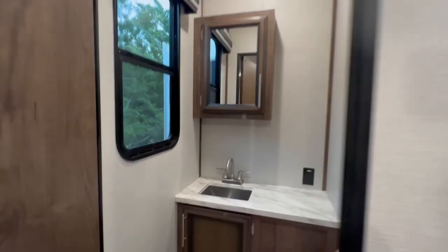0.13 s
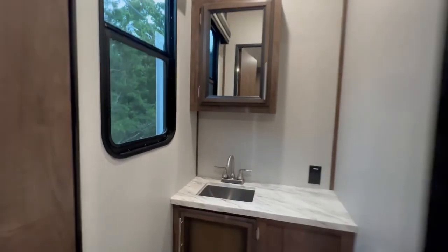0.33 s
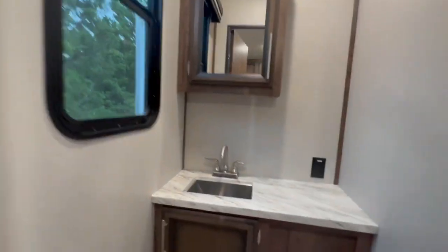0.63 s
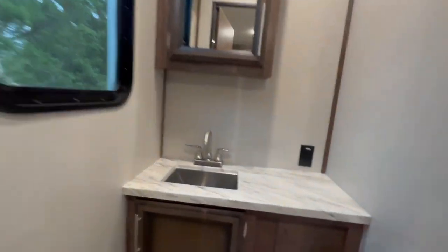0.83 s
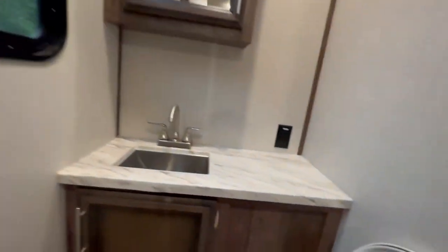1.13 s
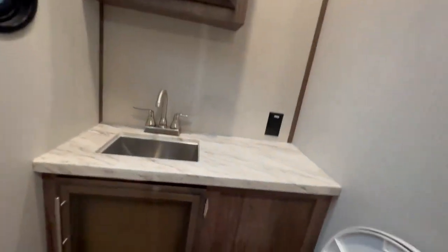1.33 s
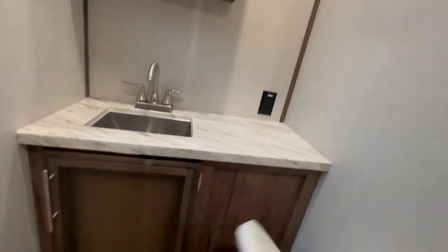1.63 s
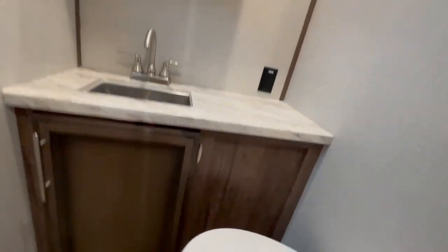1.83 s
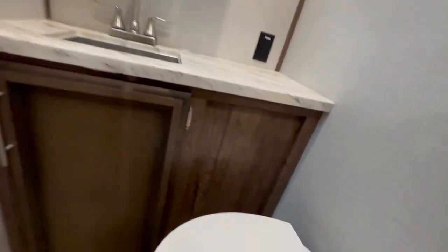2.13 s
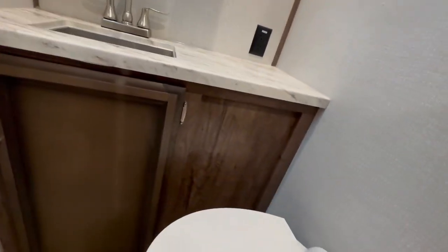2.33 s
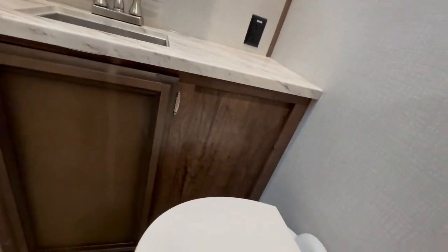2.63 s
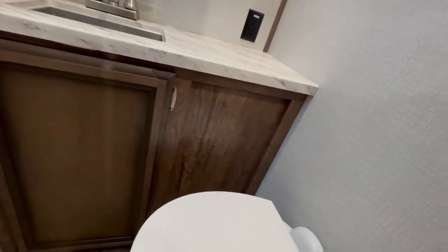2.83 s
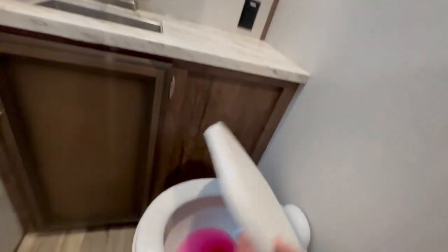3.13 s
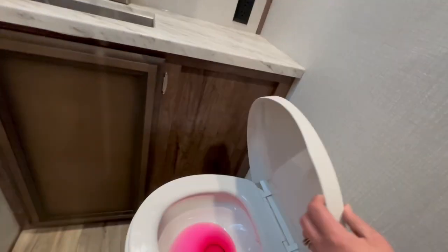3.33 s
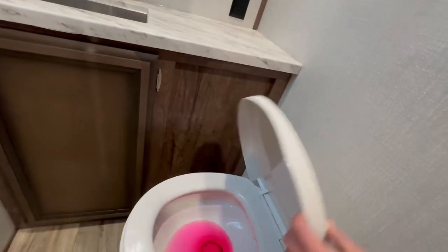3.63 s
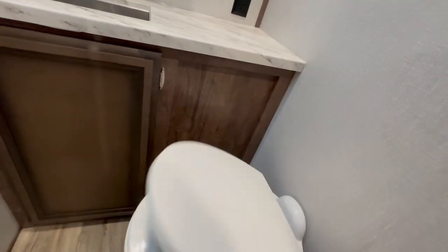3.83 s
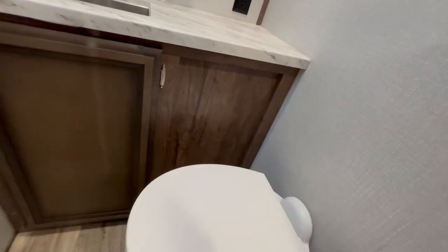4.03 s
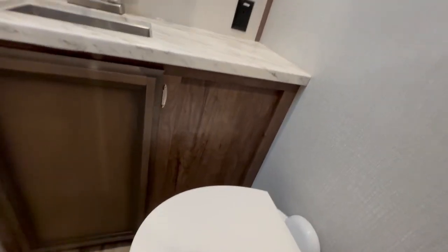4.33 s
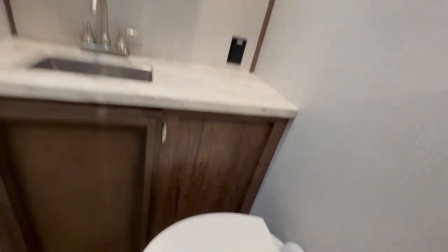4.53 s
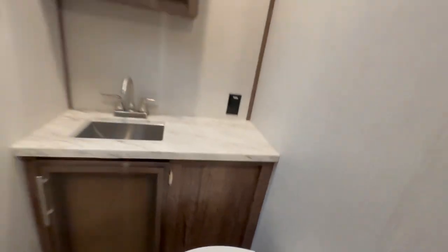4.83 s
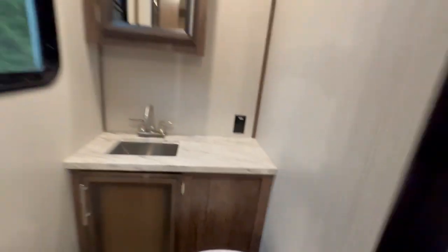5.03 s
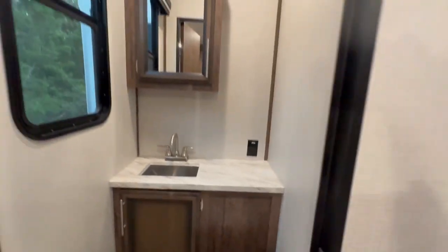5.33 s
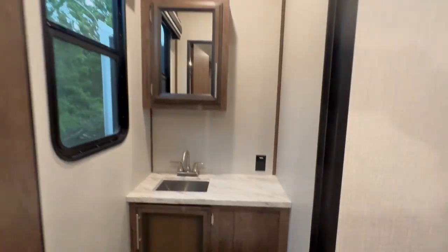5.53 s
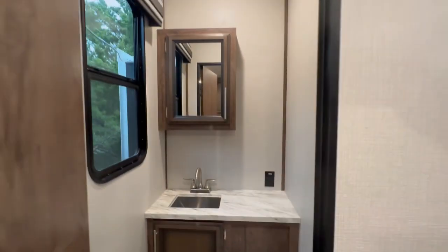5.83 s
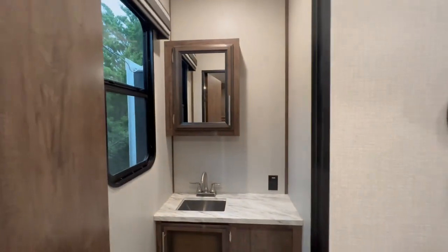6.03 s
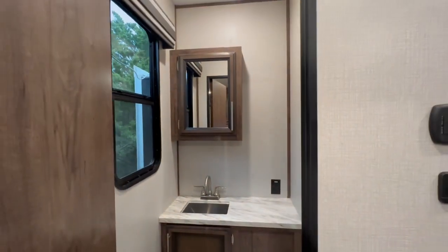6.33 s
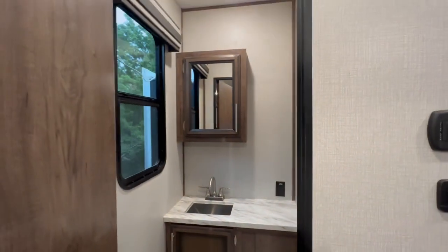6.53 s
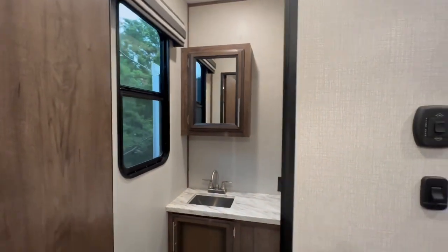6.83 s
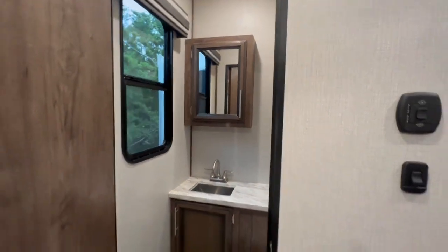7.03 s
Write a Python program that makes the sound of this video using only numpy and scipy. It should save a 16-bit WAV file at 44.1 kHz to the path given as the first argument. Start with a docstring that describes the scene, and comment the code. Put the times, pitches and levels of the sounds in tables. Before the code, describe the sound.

Hard plastic toilet lid clacks and drops shut in a tiny bathroom, with heavy low microphone bumps, soft knocks and faint hiss.

```python
"""Plastic toilet lid in a very small bathroom.

The lid is lifted, knocked back on its hinge and dropped shut. Each clack is a noise crack that dies
between close walls, plus ringing lid, bowl and floor modes. Fingers bump the hand-held microphone: thumps
and taps of diving pitch. Moving about gives soft knocks and footfalls (damped modes), faint ticks and
rustles (bright decaying noise). Below lies coloured noise: an uneven low rumble and an even hiss.
"""
import sys
import numpy as np
from scipy import signal
from scipy.fft import rfft, irfft
from scipy.io import wavfile
from scipy.ndimage import uniform_filter1d

SR = 44100
rng = np.random.default_rng(int(sys.argv[2]) if len(sys.argv) > 2 else 0)


def generate_wav(signal):
    """Clip the signal to [-1, 1] and save it as 16-bit WAV at the path in sys.argv[1]."""
    frames = np.transpose(np.atleast_2d(signal))
    scaled = np.clip(frames, -1, 1) * 32767
    pcm = np.round(scaled).astype(np.int16)
    wavfile.write(sys.argv[1], SR, pcm)


N = 316638


def from_db(db):
    """Amplitude factor of a level in dB."""
    return 10 ** (np.asarray(db) / 20)


def rms_one(x):
    """Scales a sound to rms 1."""
    return x / np.sqrt(np.mean(x ** 2) + 1e-20)


def onset_one(x):
    """Scales a stereo sound so that its first 30 ms have rms 1."""
    return x / np.sqrt(np.mean(x[:, :int(.03 * SR)] ** 2) + 1e-20)


def at_hz(points, hz):
    """Reads a (Hz, dB) table on a log-frequency axis."""
    table_hz, table_db = np.transpose(points)
    return np.interp(np.log(hz), np.log(table_hz), table_db)


def bins_hz(size):
    """FFT bin frequencies, at least 1 Hz."""
    return np.maximum(np.fft.rfftfreq(size, 1 / SR), 1)


def event_time():
    """Time axis of one short sound, 0.5 s."""
    return np.arange(SR // 2) / SR


def add(out, start_s, sound):
    """Mixes a stereo sound in at its start time."""
    i = max(int(start_s * SR), 0)
    out[:, i:i + sound.shape[1]] += sound[:, :max(N - i, 0)]


def coloured(spectrum, size):
    """White noise shaped by a spectrum; rms 1."""
    noise = rfft(rng.standard_normal(size))
    return rms_one(irfft(noise * from_db(at_hz(spectrum, bins_hz(size))), size))


def diffuse(spectrum, size, alike=0.045):
    """Stereo noise from all sides; alike is the left-right correlation."""
    mid = np.sqrt(1 + alike) * coloured(spectrum, size)
    side = np.sqrt(1 - alike) * coloured(spectrum, size)
    return rms_one(mid + side * [[1], [-1]])


def fade(t, rise_s, t60_s):
    """Exponential swell (time constant rise_s) times exponential decay."""
    return (1 - np.exp(-t / max(rise_s, 1e-5))) * from_db(-60 * t / t60_s)


def ring(modes, rise_s, spread_db):
    """Struck modes; force is shared anew per blow, standing waves put some modes out of step between sides."""
    t, out = event_time(), 0
    for hz, db, t60_s, alike in modes:
        apart = np.arccos(np.clip(alike, -1, 1)) * rng.choice([-1, 1])
        phase = rng.uniform(0, 2 * np.pi) + apart * np.array([[0], [1]])
        gain = from_db(db + spread_db * rng.standard_normal((2, 1)))
        out = out + gain * fade(t, rise_s, t60_s) * np.sin(2 * np.pi * hz * t + phase)
    return onset_one(out)


def waver(knots_per_s):
    """Slow random curve over the whole scene; rms 1."""
    knots = rng.standard_normal(int(knots_per_s * N / SR) + 2)
    return rms_one(np.interp(np.arange(N) * knots_per_s / SR, np.arange(len(knots)), knots))


# Handling of the microphone. Each row: time in seconds, handling level in dB (only its swing about the mean counts).
HANDLING_SWING = [(0.0, -49.5), (0.36, -52), (1.3, -46.5), (1.9, -53.5), (2.28, -37.5), (2.46, -49),
                  (3.0, -42.5), (3.62, -46.5), (4.24, -45), (4.4, -38), (5.62, -41), (6.26, -51.5),
                  (6.48, -54), (7.18, -52.5)]
# Rumble colour. Each row: frequency in Hz, relative density in dB per Hz.
RUMBLE_COLOUR = [(22, -19.5), (35, -5.5), (58, 5), (110, -2.5), (160, -7.5), (230, -19.5), (320, -27),
                 (500, -37.5), (1000, -68.5)]
# Hiss colour. Each row: frequency in Hz, relative density in dB per Hz.
HISS_COLOUR = [(200, -16.5), (550, -6.5), (900, 4), (1250, -1.5), (2050, 7.5), (2700, -12), (3500, -12.5),
               (4400, -12), (5200, -21), (6400, -10.5), (7500, -17), (8700, -12), (10000, -45),
               (15000, -45)]
# Background attenuation on the right. Each row: frequency in Hz, attenuation in dB.
RIGHT_LOSS = [(60, 9.5), (250, 8), (700, 5.5), (1290, 5), (2300, 18.5), (4400, 0.5), (8100, 12),
              (15000, -1)]
RUMBLE_DB, RUMBLE_FOLLOWS = -43.5, 0.54   # left level at mean handling; share of the handling swing
HISS_DB = -53.5   # left level


def background(lag_s=0.00071, rumble_own=1.0, hiss_own=0.8):
    """Rumble follows the handling, hiss is even; own is the right's independent part, the rest arrives late."""
    time_s, handling_db = np.transpose(HANDLING_SWING)
    rumble_db = RUMBLE_DB + RUMBLE_FOLLOWS * (handling_db - handling_db.mean())
    lumps_db = 2.66 * waver(knots_per_s=12)
    rumble = from_db(np.interp(np.arange(N) / SR, time_s, rumble_db) + lumps_db)
    layers = [(rumble, RUMBLE_COLOUR, rumble_own), (from_db(HISS_DB), HISS_COLOUR, hiss_own)]
    left, right = 0, 0
    for level, spectrum, own in layers:
        shared = coloured(spectrum, N)
        late = np.roll(shared, round(lag_s * SR))
        left = left + level * shared
        right = right + level * (np.sqrt(1 - own ** 2) * late + own * coloured(spectrum, N))
    shade = from_db(-at_hz(RIGHT_LOSS, bins_hz(N)))
    return np.array([left, irfft(rfft(right) * shade, N)])


# Faint rustles of movement. Each row: start in seconds, level in dB, swell time constant in seconds.
MOVEMENT_RUSTLES = [(.015, -60.5, 0.016), (0.354, -51, 0.0022), (0.544, -55.5, 0.0039),
                    (.974, -54.5, 0.0096), (1.72, -58.5, 0.081), (3.619, -62.5, 0.055), (4.426, -56, 0.017),
                    (4.748, -58.5, 0.008), (4.99, -57.5, 0.007), (6.035, -61, 0.023), (6.496, -57, 0.0032)]
# Colour of rustles and ticks. Each row: frequency in Hz, relative density in dB per Hz.
BRIGHT_COLOUR = [(300, 8.5), (900, 3.5), (2500, 1), (4200, 2.5), (5300, 0), (6500, 3), (8700, -0.5),
                 (10500, -13.5), (14500, -15)]
# t60 of a rustle at RUSTLE_DB; a bigger movement lasts longer
RUSTLE_T60_S, RUSTLE_DB, RUSTLE_DB_PER_DOUBLING = 0.43, -57.5, 9


def rustles(grain=0.06):
    """Brief uneven swells of bright friction noise."""
    out, t = np.zeros((2, N)), event_time()
    for start_s, db, swell_s in MOVEMENT_RUSTLES:
        t60_s = RUSTLE_T60_S * 2 ** ((db - RUSTLE_DB) / RUSTLE_DB_PER_DOUBLING)
        smooth = uniform_filter1d(rng.standard_normal(len(t)), size=300)
        uneven = np.exp(grain * rms_one(smooth))
        friction = diffuse(BRIGHT_COLOUR, len(t), alike=0.18) * uneven
        add(out, start_s, from_db(db) * onset_one(friction * fade(t, swell_s, t60_s)))
    return out * from_db([[.9], [-.9]])


def resonate(x, hz, width_hz):
    """Two-pole resonance, peak gain about 1."""
    r = np.exp(-np.pi * width_hz / SR)
    zeros = np.array([1, 0, -1]) * (1 - r * r) / 2
    poles = [1, -2 * r * np.cos(2 * np.pi * hz / SR), r * r]
    return signal.lfilter(zeros, poles, x)


# Small fittings tick. Each row: start in seconds, level in dB, pitch in Hz, ring at that pitch in dB re the click.
FITTING_TICKS = [(0.742, -50, 2700, -0.5), (0.83, -55, 4100, -2), (1.175, -46.5, 3630, 12),
                 (1.177, -51.5, 1580, 16), (1.401, -51, 1190, 9), (1.51, -51, 3940, 1),
                 (2.06, -58.5, 4640, -5), (3.832, -52.5, 1510, 7), (4.175, -38.5, 8550, -11),
                 (4.332, -51.5, 3960, 2)]
TICK_T60_S = 0.27   # room tail, same for all ticks


def ticks(ring_width=0.3):
    """Light bright contacts with one ringing region, heard mostly through the room."""
    out, t = np.zeros((2, N)), event_time()
    room_tail = fade(t, 0.0017, TICK_T60_S)
    direct = 0.2 * fade(t, 0.00099, 0.038)
    for start_s, db, hz, ring_db in FITTING_TICKS:
        click = diffuse(BRIGHT_COLOUR, len(t), alike=0.099)
        tone = diffuse(BRIGHT_COLOUR, len(t))
        for _ in range(2):
            tone = resonate(tone, hz, ring_width * hz)
        mix = click + from_db(ring_db) * rms_one(tone)
        add(out, start_s, from_db(db) * onset_one(mix * (room_tail + direct)))
    return out * from_db([[.4], [-.4]])


# Soft knocks on wall and cabinet panels.
# Each row: start in seconds, level in dB, pitch in Hz, t60 in seconds, rub in dB re the panel mode.
PANEL_KNOCKS = [(.975, -54.5, 950, 0.56, 13.5), (1.473, -45.5, 341, 0.29, 8),
                (1.513, -40.5, 411, 0.11, 1.5), (1.998, -45.5, 282.4, .2, 1), (2.054, -41, 277.3, .24, 2),
                (2.795, -43.5, 344, 0.23, -12), (3.832, -57.5, 292, 0.21, 7.5),
                (4.339, -43.5, 227, 0.27, -1.5), (5.425, -51, 528, 0.045, -6)]
# Colour of rubs and skin. Each row: frequency in Hz, relative density in dB per Hz.
RUB_COLOUR = [(120, 11), (350, 1), (600, -3.5), (1000, -3), (1600, -14), (4000, -28), (12000, -44)]


def knocks():
    """Dull blows: one damped panel mode and a short noise rub."""
    out, t = np.zeros((2, N)), event_time()
    for start_s, db, hz, t60_s, rub_db in PANEL_KNOCKS:
        rub = onset_one(diffuse(RUB_COLOUR, len(t)) * fade(t, 0.0014, t60_s))
        panel = ring([(hz, 0, t60_s, .6)], rise_s=0.001, spread_db=2.7)
        add(out, start_s, from_db(db) * (panel + from_db(rub_db) * rub))
    return out


def fidgets():
    """Three faint finger bumps at random moments while the free hand is busy: (s, thump dB, tap dB)."""
    return [(rng.uniform(2.528, 4.7), rng.uniform(-33.31, -31.5), rng.uniform(-44.31, -42.5))
            for _ in range(3)]


# Finger bumps on the microphone. Each row: start in seconds, thump on the left in dB, tap on the left in dB.
FINGER_BUMPS = [(1.0572, -3.5, -21), (1.3621, -36, -34), (1.4723, -49, -29), (1.927, -33, -35),
                (2.7092, -29, -29.5), (2.876, -34, -30), (4.0414, -32.5, -28.5), (4.398, -27, -31),
                (4.6762, -13.8, -39.5), (4.715, -13, -31), (4.983, -22, -39), (5.121, -23.5, -43),
                (5.403, -19, -34), (5.428, -15, -36)]
# At BUMP_DB: time from touch to peak, and starting pitch. A heavier thump peaks later and starts higher.
BUMP_DB, BUMP_PEAK_S, BUMP_DB_PER_DOUBLING = -18.5, 0.014, 94
BUMP_HZ, BUMP_DB_PER_OCTAVE = 470, 15


def bumps(right_db=-9, right_lag_rad=2.14, skin_db=-5, shudder_db=-26):
    """Skin tap and thump; pitch dives because highs travel through the casing faster than lows."""
    out, t = np.zeros((2, N)), event_time()
    stretch = .45   # growth of the period per unit time
    sides, lag_rad = from_db([[0], [right_db]]), np.array([[0], [right_lag_rad]])
    for start_s, thump_db, tap_db in FINGER_BUMPS + fidgets():
        heavier_db = thump_db - BUMP_DB
        age = t / (BUMP_PEAK_S * 2 ** (heavier_db / BUMP_DB_PER_DOUBLING))
        start_hz = BUMP_HZ * 2 ** (heavier_db / BUMP_DB_PER_OCTAVE)
        sweep = 2 * np.pi * np.log1p(stretch * t * start_hz) / stretch
        thump = age ** 2 * np.exp(1 - age ** 2) * np.cos(sweep - lag_rad)
        # the grip settles
        shudder = from_db(shudder_db) * coloured(RUMBLE_COLOUR, len(t)) * fade(t, 0.0094, 0.37)
        tap_sweep = 2 * np.pi * 3.87 * np.log1p(t / 0.00345)
        tap = fade(t, 0.00094, 0.024) * np.sin(tap_sweep - lag_rad)
        skin = from_db(skin_db) * coloured(RUB_COLOUR, len(t)) * fade(t, 0.00018, 0.033)
        bump = from_db(thump_db) * (thump + shudder) + from_db(tap_db) * (tap + skin)
        add(out, start_s, sides * bump)
    return out


def contact_db(hz, tilt_db, focus_hz, lift_db, octaves=0.098):
    """Place and hardness of a contact tilt the spectrum and favour one region."""
    distance = np.log2(hz / focus_hz)
    return tilt_db * distance + lift_db * np.exp(-.5 * (distance / octaves) ** 2)


# Broad resonances of the lid shell. Each row: centre in Hz, width in Hz, lift in dB.
SHELL_HUMPS = [(1190, 57, 7), (1485, 44, 2.5), (3400, 790, 4.5), (4590, 250, 9.5)]


def shell_db(hz):
    """Sum of the shell humps, which colour the crack."""
    return sum(lift_db / (1 + (2 * (hz - centre_hz) / width_hz) ** 2)
               for centre_hz, width_hz, lift_db in SHELL_HUMPS)


# Decay of the room. Each row: band centre in Hz, t60 in seconds.
ROOM_DECAY = [(150, 0.41), (500, 0.21), (1400, 0.29), (4500, 0.25), (8000, 0.21), (15000, 0.15)]


def crack(walls, contact, rise_s, direct_db=0, direct_s=0.0014):
    """Hard contact and its dense wall reflections, dying band by band."""
    t, out = event_time(), 0
    hz = bins_hz(len(t))
    noise = rfft(walls) * from_db(contact_db(hz, *contact) + shell_db(hz))
    centres_hz, t60s = np.transpose(ROOM_DECAY)
    for share, t60_s in zip(np.eye(len(centres_hz)), t60s):
        weight = np.interp(np.log(hz), np.log(centres_hz), share)   # crossfades between bands
        out = out + irfft(noise * weight, len(t)) * fade(t, rise_s, t60_s)
    return onset_one(out * (1 + from_db(direct_db) * np.exp(-t / direct_s)))


# Lid blows. Each row: start in seconds, crack level in dB, rise time constant in seconds, tilt in dB per octave,
# pitch favoured by the contact in Hz, its lift in dB, rebound delay in seconds, rebound in dB re the crack,
# bowl level in dB, floor level in dB.
LID_BLOWS = [(1.62, -34, 0.0052, -2.5, 1480, 13, .026, -7, -63, -58),
             (2.4167, -20, 0.0032, -0.5, 1110, 6.5, .011, -17.5, -32.5, -31),
             (2.783, -31, 0.006, -2, 1500, 6.5, 0.02, -9, -40.5, -42.5),
             (4.173, -29.5, 0.0059, -2.5, 443, 9.5, 0.01, -6, -28, -24)]
# Lid modes. Each row: frequency in Hz, level before contact colour in dB, t60 in seconds, left-right likeness -1..1.
LID_MODES = [(458, -13, .16, 0), (655, -15, .18, .3), (782, -11, .27, .9), (1018, -7, .21, .6),
             (1110, -5, .15, .2), (1160, -2, .13, -.3), (1192, 0, .2, -.2), (1265, -14, .18, -.3),
             (1416, -12, .29, -.6), (1518, -8, .29, -.4), (1610, -14, .24, 0), (1900, -12, .2, 0),
             (2249, -10, .2, 0), (2505, -11, .19, .9), (2950, -11, .17, .3), (3212, -8, .19, .4),
             (3386, -11, .25, .4), (3540, -9, .26, .4), (3713, -10, .21, .4), (4194, -10, .16, .4),
             (4575, -6, .21, .7), (4780, -7, .17, .6), (5015, -13, .19, .3), (5361, -13, .18, .3),
             (5896, -11, .15, .3), (6119, -12, .15, .3), (6641, -13, .18, .3)]
# Crack of plastic on plastic. Each row: frequency in Hz, relative density in dB per Hz.
CRACK_COLOUR = [(150, -15), (300, -8.5), (430, -15.5), (750, -2.5), (1150, -2.5), (2000, -4), (2700, -6),
                (4300, -4), (5200, -8), (6400, -2), (7500, -13), (8700, -11), (10500, -21.5), (15000, -35)]
# Hollow bowl modes. Each row: frequency in Hz, relative level in dB, t60 in seconds, left-right likeness.
BOWL_MODES = [(202.4, -7.5, 0.27, 0.26), (243, 7.5, 0.1, 1), (280, 0.5, 0.12, 1), (348, -11.5, 0.13, 0.82),
              (393, -25, 0.12, 0.93), (473.4, -15, 0.24, 0.13)]
# Sprung floor modes. Each row: frequency in Hz, relative level in dB, t60 in seconds, left-right likeness.
FLOOR_MODES = [(60, -4, .28, .95), (104, 0, .19, .95), (124, -7, .15, .9)]
RING_DB = -3   # lid ring re the crack
BOOM_LAG_S = 0.00495   # bowl and floor answer after the lid lands


def lid():
    """Each blow cracks and rings the lid, rebounds once, and sets bowl and floor booming."""
    out = np.zeros((2, N))
    for (start_s, db, rise_s, tilt_db, focus_hz, lift_db,
         rebound_s, rebound_db, bowl_db, floor_db) in LID_BLOWS:
        contact = tilt_db, focus_hz, lift_db
        # blow and rebound take the same paths through the room
        walls = diffuse(CRACK_COLOUR, len(event_time()), alike=0.04)
        modes = [(hz, mode_db + contact_db(hz, *contact), t60_s, alike)
                 for hz, mode_db, t60_s, alike in LID_MODES]
        blow = crack(walls, contact, rise_s) + from_db(RING_DB) * ring(modes, rise_s, spread_db=0.5)
        rebound = crack(walls, contact, rise_s=.001)
        bowl = ring(BOWL_MODES, rise_s=0.007, spread_db=1.0) * from_db([[-1.5], [1.5]])
        floor = ring(FLOOR_MODES, rise_s=0.027, spread_db=5.5) * from_db([[1.5], [-1.5]])
        add(out, start_s, from_db(db) * blow)
        add(out, start_s + rebound_s, from_db(db + rebound_db) * rebound)
        add(out, start_s + BOOM_LAG_S, from_db(bowl_db) * bowl + from_db(floor_db) * floor)
    return out


# Weight shifts onto the sprung floor. Each row: start in seconds, level in dB.
FOOTFALLS = [(1.67, -42.5), (2.07, -36), (3.133, -38.5), (4.383, -40.5)]
STEP_RISE_S, STEP_TILT_DB_PER_OCTAVE = 0.0073, -8   # a soft sole favours the lowest mode


def steps():
    """Soft footfalls set the sprung floor booming."""
    out = np.zeros((2, N))
    lowest_hz = FLOOR_MODES[0][0]
    modes = [(hz, db + STEP_TILT_DB_PER_OCTAVE * np.log2(hz / lowest_hz), t60_s, alike)
             for hz, db, t60_s, alike in FLOOR_MODES]
    for start_s, db in FOOTFALLS:
        add(out, start_s, from_db(db) * ring(modes, STEP_RISE_S, spread_db=1.0))
    return out


def scene():
    """Sum of all layers."""
    return background() + rustles() + ticks() + knocks() + bumps() + lid() + steps()


def record(dry):
    """High-pass at 18 Hz and steep low-pass at 15.6 kHz."""
    highpass = signal.butter(2, 18, "high", fs=SR, output="sos")
    lowpass = signal.ellip(10, .2, 80, 15600, fs=SR, output="sos")   # 0.2 dB ripple, 80 dB stop
    return signal.sosfilt(lowpass, signal.sosfilt(highpass, dry))


dry = scene()
out = record(dry)
generate_wav(out)
```